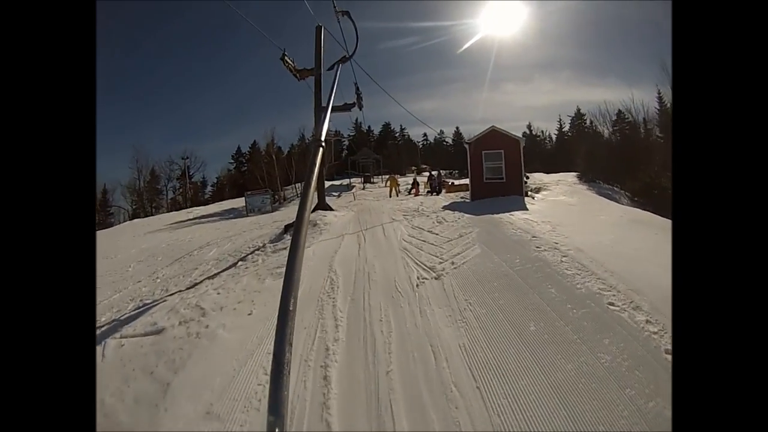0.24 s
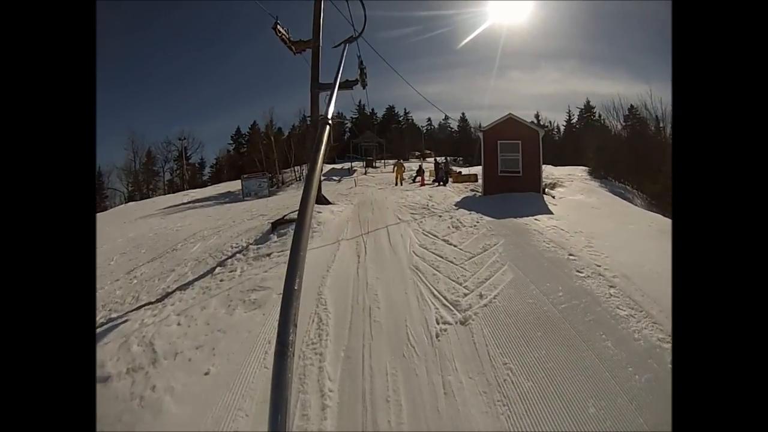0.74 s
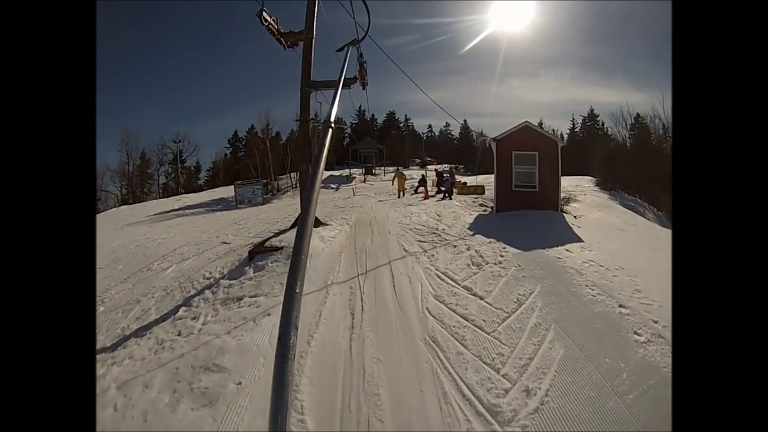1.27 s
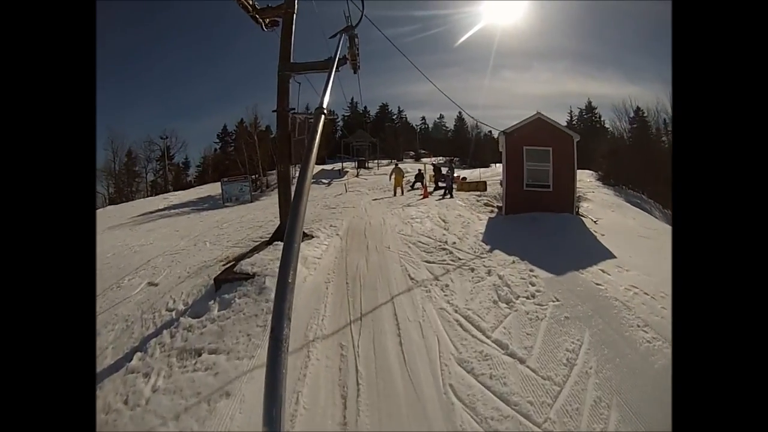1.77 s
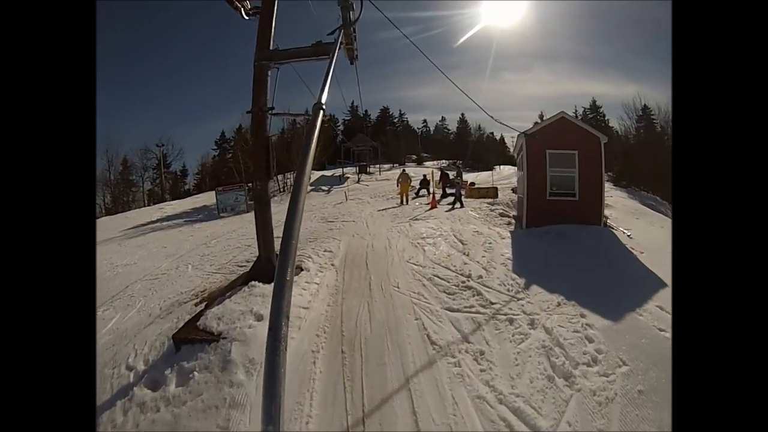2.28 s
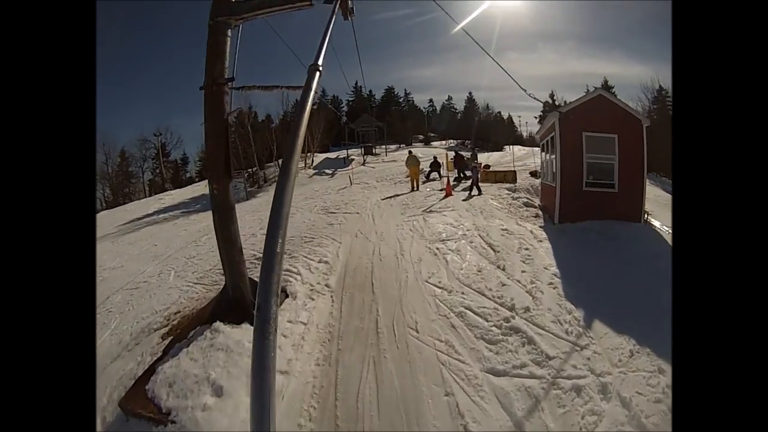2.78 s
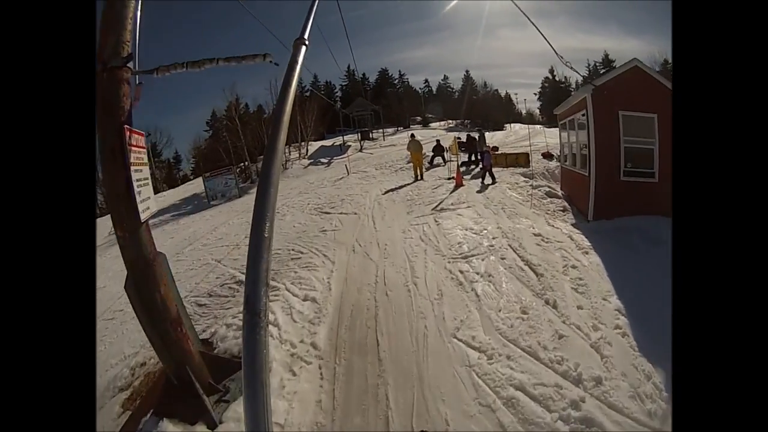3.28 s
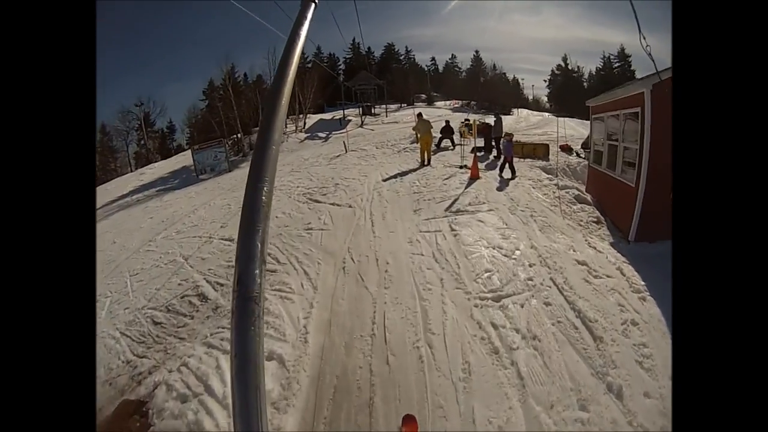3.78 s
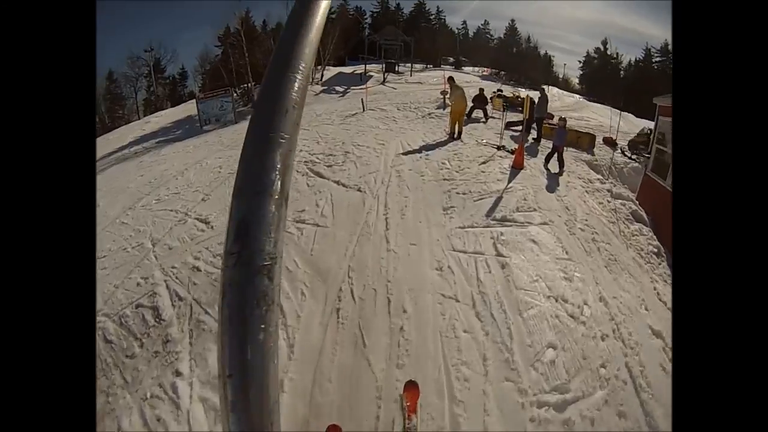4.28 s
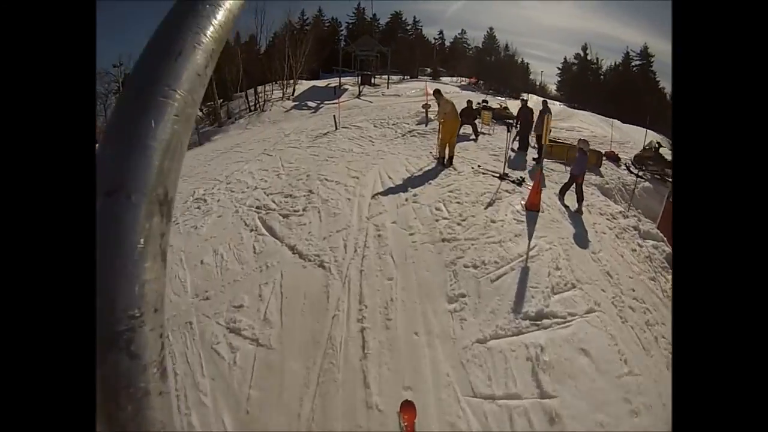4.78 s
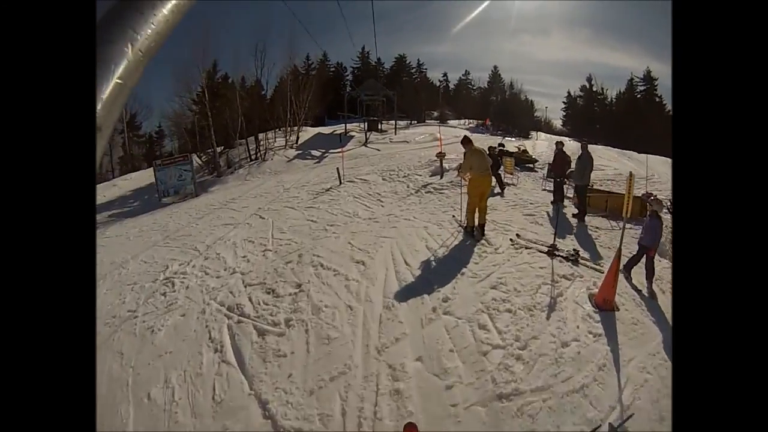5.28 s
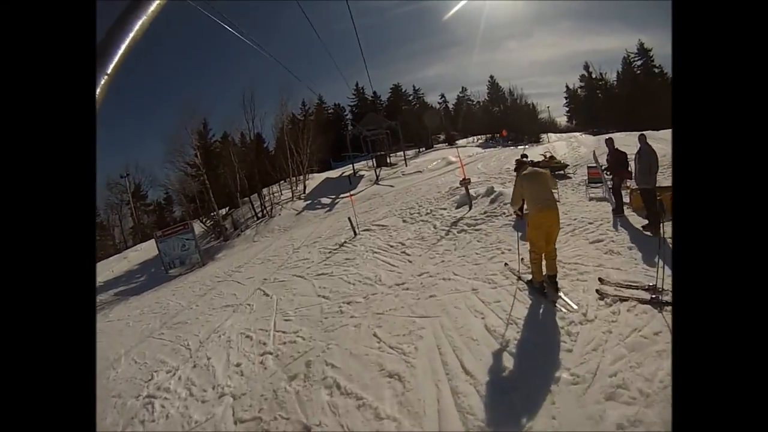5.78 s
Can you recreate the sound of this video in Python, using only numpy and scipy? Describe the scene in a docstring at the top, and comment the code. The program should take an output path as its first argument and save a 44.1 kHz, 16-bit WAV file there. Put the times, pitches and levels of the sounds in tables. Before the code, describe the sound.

Steely ticking and chatter swell into a loud ringing clatter, then ease to a rubbing hum, a sharp clank and a rough metallic scrape.

```python
"""Snowy slope on a surface ski lift: a steel pole tows a rider, heard by a small camera in a closed housing.
Grip and spring knock and chatter, hardest over the tower wheels: pulses ringing modes, plus coloured noise.
Rope friction keeps the steel singing: a hail of tiny slips drives the same modes; loose parts tick at random.
Light wind rumbles and flutters on the housing over a steady hiss, all coloured noise.
At the end the pole swings aside and scrapes: the slips drive a few bands of their own."""
import sys
import numpy as np
from scipy import signal
from scipy.fft import rfft, irfft
from scipy.io import wavfile
from scipy.ndimage import uniform_filter1d

SR = 44100
rng = np.random.default_rng(int(sys.argv[2]) if len(sys.argv) > 2 else 0)


def wav_out(sig):
    """Save sig, one row per channel (or a flat mono array), as 16-bit PCM at SR to the path in sys.argv[1]."""
    wavfile.write(sys.argv[1], SR, np.round(np.clip(np.atleast_2d(sig).T, -1, 1) * 32767).astype(np.int16))


N = 266356


def undb(db):
    """Amplitude of a level in dB."""
    return 10 ** (np.asarray(db) / 20)


def unit(x):
    """Scale to rms 1."""
    return x / np.sqrt(np.mean(x ** 2))


def curves(table):
    """Columns of a table joined by straight lines in time."""
    s, *columns = np.transpose(table)
    return [np.interp(np.arange(N) / SR, s, column) for column in columns]


def colour(x, points, size=2048):
    """Minimum-phase filter shaped by f/Hz, gain/dB points; white noise keeps its power."""
    hz, db = np.transpose(points)
    grid = np.maximum(np.arange(size + 1) * SR / 2 / size, 1)
    log_gain = np.interp(np.log(grid), np.log(hz), db) * np.log(10) / 20
    # folding the cepstrum onto positive time makes the filter causal
    cepstrum = irfft(log_gain)
    cepstrum[1:size] *= 2
    cepstrum[size + 1:] = 0
    taps = irfft(np.exp(rfft(cepstrum)))
    return signal.fftconvolve(x, taps / np.sqrt(np.sum(taps ** 2)))[:N]


def white():
    """White noise with spread 1."""
    return rng.standard_normal(N)


def turns(shape):
    """Unit phasors at random phases."""
    return np.exp(2j * np.pi * rng.random(shape))


def fall(x, t60):
    """Decay that dies 60 dB in t60 s."""
    return signal.lfilter([1], [1, -np.exp(-np.log(1000) / (t60 * SR))], x)


def walk(rate):
    """Random levels held 1 / rate s and slewed twice; spread 1."""
    steps = np.repeat(rng.standard_normal(int(N / SR * rate) + 2), 16)
    for _ in range(2):
        steps = uniform_filter1d(steps, size=16)
    return np.interp(np.arange(N) * 16 * rate / SR, np.arange(len(steps)), unit(steps))


def carrier(hz, wander=.003):
    """Turning phase of a mode whose pitch shifts a little with the load on the pole."""
    return np.exp(2j * np.pi * np.cumsum(hz * (1 + wander * walk(6))) / SR)


def slips():
    """Friction is a hail of tiny slips of uneven size that comes in bunches."""
    size_db = 3.2 * rng.exponential(size=N)
    bunching_db = 1.3 * walk(120) + 0.21 * walk(30)
    return unit(undb(size_db + bunching_db))


def rubbed(hail, noise, t60):
    """Envelope of a mode that the slips keep ringing; rms 1 once on its carrier."""
    ring = fall(hail * np.roll(noise, rng.integers(N)), t60)
    return ring * np.sqrt(2 / np.mean(np.abs(ring) ** 2))


# how hard the rope shakes the grip: t/s, level/dB
SHAKE = [(0, -7.5), (.4, -17.5), (.64, -4.5), (.96, -10.5), (1.3, -0.5), (1.4, -9), (1.55, -17),
         (1.8, -8.5), (2.08, 0), (2.24, -7.5), (2.59, 5.5), (2.89, 8), (3.03, 8.5), (3.26, 11), (3.55, 4.5),
         (3.82, 0.5), (4.1, -4.5), (4.47, -4), (4.81, -1), (5.3, 0.5), (6.04, -1)]
# slow change in the colour of the friction: t/s, lift of the middle/dB, lift of the treble/dB
DRIFT = [(0, 2, 2), (.95, 1, -3), (2.3, -15, 9.5), (3.2, 10, 7), (4.1, 6, 9.5), (4.8, 10, 3),
         (5.1, 12.5, -11), (5.45, 9.5, 0), (6.04, 5.5, -5)]
# friction on each part of the steel, low to high:
# level/dB, share of the shake, share of the middle lift, share of the treble lift (dB per dB)
PARTS = [(-70, 1.2, .4, .01), (-74, 0.79, 1.26, .01), (-53.5, .6, 0.11, 0.022), (-60, 0.46, 1.04, .01),
         (-60.5, 1.3, 0.52, .01), (-59, 0.96, .01, .01), (-65.5, 0.87, 0.83, .01), (-64, 1.03, .01, 0.99),
         (-77, 1.1, .01, .6)]


def friction_levels():
    """Level in dB over time of the rope's rubbing on each part of the steel."""
    shake, = curves(SHAKE)
    return np.array(PARTS) @ np.array([np.ones(N), shake, *curves(DRIFT)])


# wind strength: t/s, level/dB
WIND = [(0, -60.5), (1.4, -59), (1.7, -59), (2.34, -59), (2.44, -51.5), (3.5, -51.5), (3.75, -55.5),
        (4.5, -53.5), (6.04, -49.5)]
# single gusts on top of it: t/s, lift/dB
GUSTS = [(4.69, 4.9), (5.03, 5), (5.33, 7), (5.662, 6), (5.85, 9), (6.04, 2.3)]
GUST_S = 0.038  # spread of each bell-shaped gust, s


def wind_levels():
    """Level of the wind in dB over time: a slow curve with short bell-shaped gusts."""
    t = np.arange(N) / SR
    gusts_db = sum(db * np.exp(-((t - s) / GUST_S) ** 2 / 2) for s, db in GUSTS)
    return curves(WIND)[0] + gusts_db


# bass colour of the wind: f/Hz, relative level/dB (per Hz)
WIND_COLOUR = [(12, -28), (20, -0.5), (33, -3), (65, -2.5), (78, -3.5), (102, -16.5), (130, -29),
               (170, -44), (290, -120)]


def wind_rumble(wind_db):
    """Turbulence pushes on the housing: low coloured noise with a wandering level."""
    return undb(wind_db + 0.66 * walk(5.8)) * colour(white(), WIND_COLOUR, size=8192)


# colour of the flutter: f/Hz, relative level/dB (per Hz)
FLUTTER = [(100, -25), (190, 7), (300, 0.5), (520, -24)]
FLUTTER_DB, FLUTTER_SHARE = -74.5, 0.97  # level in the opening wind, dB; dB per dB of wind


def wind_flutter(wind_db):
    """Higher turbulence that grows with the wind."""
    flutter_db = FLUTTER_DB + FLUTTER_SHARE * (wind_db - WIND[0][1])
    return undb(flutter_db) * colour(white(), FLUTTER)


# colour of the hiss: f/Hz, relative level/dB (per Hz)
HISS = [(53, -24.5), (90, 2.5), (864, -12.5), (1550, -3), (1760, -6.5), (3290, -6.5), (3820, -3),
        (4950, -19), (5750, -13), (11500, -22.5), (15500, -33)]
HISS_DB = -52


def hiss():
    """Steady coloured noise of skis and microphone."""
    return undb(HISS_DB + 0.3 * walk(5.4)) * colour(white(), HISS)


def air():
    """One wind drives rumble and flutter; the hiss lies beneath."""
    wind_db = wind_levels()
    return wind_rumble(wind_db) + wind_flutter(wind_db) + hiss()


# knocks of grip and spring on the pole:
# t/s, level/dB, then shares of the tube/dB, of the clear ring/dB, of the treble parts/dB
KNOCKS = [(0.039, -45, 3, -14, -11), (0.2864, -38, -5, -6, -15), (.436, -36, -8, -6.5, -13),
          (0.5573, -44, -15, -6, -7), (.707, -29, -8, -25, -19), (0.712, -32.5, -18, -3, -18),
          (0.86, -46, -13, -7, -23), (1.2652, -28, -14, -4.5, -13), (1.286, -46, 5, 1.5, -24),
          (1.4128, -22, -6, -3, -9.5), (1.4513, -39.5, -15, -11, -9), (1.5893, -37, -30, -15, -10),
          (1.6005, -32.5, -25, -5.5, -14), (1.6376, -32, -3, -4, -12), (1.6452, -35.5, -16, 2, -7),
          (1.7557, -29.5, -10.5, -7, -19), (1.8372, -21.5, -17, -2, -17), (1.8546, -32.5, -27, 1.5, -9),
          (1.9345, -42, 6.5, -22, -8), (1.9875, -20.5, -16, -16, -23), (2.0097, -28.5, -30, 4, -8.5),
          (2.133, -26, -9, -5, -12.5), (2.1477, -37, -23, -22, -5), (2.2411, -31.5, -2.5, 3.5, -1),
          (2.3819, -27.5, -7, 4, -10), (2.3904, -40, -30, -29, 2), (2.499, -38, 6, 4, 4),
          (2.5174, -27.5, -33, -22, -10), (2.5287, -27.5, -6, -0.5, -5), (2.642, -27.5, -7, -0.5, -10),
          (2.669, -31, -11, -14, -16), (2.683, -30, -9, -1, -6), (2.7292, -21, -39, -2.5, -10.5),
          (2.749, -28.5, -12, 0, -5), (2.7735, -25.5, -15, -2.5, -9), (2.7908, -23, -3, -28, -1),
          (2.8485, -22.5, -22, -25, -15), (2.8582, -22, -27, -18, -18), (2.8769, -15, -10, -7, -5.5),
          (2.8882, -16, -10, -20, -27), (2.935, -20.5, -13, -8, -14), (2.974, -23, -24, -24, -3),
          (2.989, -22, -26, -12, -12), (3.041, -23, -4, -25, -3), (3.0939, -21.5, -34, -25, -13),
          (3.1087, -26, -31, -15, -24), (3.131, -30, -15, -19, -26), (3.1378, -14.5, -24, -13, -13),
          (3.233, -34.5, -9, -10, 3), (3.263, -21, -12, -32, -10), (3.276, -22.5, -25, -3.5, -7),
          (3.29, -24, -17, -14, -8), (3.3338, -29, 3, -23, -7), (3.3437, -14, -12, -30, -23),
          (3.3846, -9, -7.5, -10, -7), (3.42, -55, -15, 14, -21), (3.5665, -41, -6, -4, -1),
          (3.5903, -27.5, 0.5, -17, -8), (3.7147, -26, -18, -34, -9), (3.827, -36, 3, -11, -13),
          (3.8597, -37.5, -5, -1, -14), (4.0497, -46.5, 11, -19, -5), (4.122, -40, -3, -22, -17),
          (4.4119, -32, 6.5, 1, -5), (4.778, -44, -4, 9, -6), (4.897, -33.5, 8, 14, 0.5),
          (5.0795, -16, -4, 3.5, -13.5), (5.4051, -43, -16, 5, -20), (5.605, -41.5, 11, 3, -7),
          (5.7594, -43.5, -1, 0, -10)]
TOP_SCATTER_DB = 3


def knock_levels():
    """Level in dB of every knock in each part of the steel, low to high."""
    s, strike_db, tube, clear, collar = np.transpose(KNOCKS)
    top_scatter = TOP_SCATTER_DB * rng.standard_normal(len(s))
    return strike_db + np.array([
        tube - 33., tube - 29., tube - 8., tube - 9.,
        clear - 4.5,
        0 * tube - 8.,
        collar - 10., collar - 16., 1.35 * collar - 5. + top_scatter])


CHATTER_MS = 4.8


def chatter(count=6):
    """Sample and level of each hit: a knock is a first contact and a few weaker, scattered rebounds."""
    s = np.transpose(KNOCKS)[0]
    late = rng.random((len(s), count)) * (np.arange(count) > 0)  # share of the chatter length
    at = np.clip(((s[:, None] + late * CHATTER_MS / 1000) * SR).astype(int), 0, N - 1)
    rebound_db = (late > 0) * (-6. - 4.26 * late + 0.87 * rng.standard_normal(late.shape))
    return at, rebound_db


SINGS_HZ = 3626  # the mode that holds the clear ring
SINGS_ON_DB, SINGS_ON_SHARE, SINGS_ON_T60_S = -34, 0.33, 0.42  # level; dB per dB of knock; decay


def clear_ring():
    """Envelope of the ring a knock leaves singing; hard knocks make it only a little louder."""
    s, strike_db, _, clear, _ = np.transpose(KNOCKS)
    ring_db = SINGS_ON_DB + SINGS_ON_SHARE * strike_db + clear
    struck = np.zeros(N, complex)
    np.add.at(struck, (s * SR).astype(int), undb(ring_db) * turns(len(s)))
    return fall(struck, SINGS_ON_T60_S) * undb(5.0 * walk(60))


RATTLE_PER_S = 70


def rattle(rub_db):
    """Loose parts tick at random, and stand out more the harder the rope shakes."""
    ticks = np.flatnonzero(rng.random(N) < RATTLE_PER_S / SR)
    shaken_db = 1.33 * (rub_db[6][ticks] + 36.0)
    return ticks, 1.73 + 3.9 * rng.exponential(size=len(ticks)) + shaken_db


# modes of the pole and its fittings: f/Hz, level/dB, t60/s
STEEL = [(570, 0, .03), (870, 0, .1), (1150, -14, .1), (1470, -6, .05), (1570, 0, .08), (1900, -4, .07),
         (1970, -5, .06), (2240, -2, .06), (2490, -10, .06), (2740, -5, .08), (3130, -4, .08),
         (3626, 0, .13), (3692, -4, .08), (3785, -4, .07), (3945, -3, .045), (4060, 0, .05),
         (4190, -2, .055), (4345, -1, .055), (4410, -1, .05), (4495, -1, .04), (4680, -6, .06),
         (4850, -11, .05), (5700, -2, .05), (5880, 0, .04), (6230, -2, .04), (6410, -3, .05),
         (7030, -3, .04), (7420, 0, .03), (10220, -2, .055), (10320, 0, .06)]
# borders between the parts of the steel, low to high: f/Hz
PARTS_HZ = (700, 1000, 2450, 3450, 3740, 5000, 6600, 9000)


def ringing_modes(noise, hail, rub_db, hits, rattling):
    """Knocks, rattle and friction ring the same decaying modes."""
    (at, rebound_db), (ticks, tick_db) = hits, rattling
    knock_db, ring = knock_levels(), clear_ring()
    out = np.zeros(N)
    for hz, db, t60 in STEEL:
        part = np.searchsorted(PARTS_HZ, hz)
        # each knock lands elsewhere and so weights the modes anew
        spot_db = 8 * (rng.random((len(at), 1)) - .5)
        size_db = knock_db[part][:, None] + db + spot_db + rebound_db
        push = np.zeros(N, complex)
        np.add.at(push, at, undb(size_db) * turns(at.shape))
        push[ticks] += undb(rub_db[part][ticks] + db + tick_db) * turns(len(ticks))
        # lasting contact damps a rubbed mode more than a struck one
        drag = undb(rub_db[part] + db + 3.8 * walk(9)) * rubbed(hail, noise, 0.49 * t60)
        envelope = fall(push, t60) + drag + (hz == SINGS_HZ) * ring
        out += (envelope * carrier(hz)).imag
    return out


# colour of broad contact noise: f/Hz, relative level/dB (per Hz)
HOUSING = [(180, -71), (300, -18), (1300, -19), (1540, -10.5), (1730, -27.5), (1970, -5), (2930, -9),
           (4210, 5), (5130, -10), (5950, -1.5), (7250, -8), (8420, -21.5), (10600, -15.5), (13600, -20.5),
           (15500, -112)]


def contact_noise(hail, rub_db, hits, rattling):
    """The contact itself: a crack, a longer chatter and the steady rasp, as coloured noise."""
    (at, rebound_db), (ticks, tick_db) = hits, rattling
    _, strike_db, _, _, collar = np.transpose(KNOCKS)
    # its treble follows the collar and rim, its body the fittings
    sides = (("low", strike_db, rub_db[5] + 9.0),
             ("high", strike_db + 0.52 * collar + 8.5, rub_db[7] + 7.0))
    out = np.zeros(N)
    for side, blow_db, rasp_db in sides:
        blows = np.zeros(N)
        np.add.at(blows, at, undb(blow_db[:, None] + rebound_db))
        blows[ticks] += undb(rasp_db[ticks] + tick_db + 15.0)
        crack = undb(-10.0) * fall(blows, 0.013)
        long_chatter = undb(-25.0) * fall(blows, 0.19)
        rasp = undb(rasp_db - 5.0) * hail
        contact = colour((crack + long_chatter + rasp) * white(), HOUSING)
        split = signal.butter(4, PARTS_HZ[5], side, fs=SR, output="sos")
        out += signal.sosfilt(split, contact)
    return out


def steel(noise):
    """The pole rings and rasps from one set of knocks, ticks and slips; little of it sounds below 650 Hz."""
    rub_db, hits, hail = friction_levels(), chatter(), slips()
    rattling = rattle(rub_db)
    out = ringing_modes(noise, hail, rub_db, hits, rattling)
    out += contact_noise(hail, rub_db, hits, rattling)
    return signal.sosfilt(signal.butter(3, 650., "high", fs=SR, output="sos"), out)


# scrape of the swinging pole: t/s, level/dB
SCRAPE = [(5.25, -79), (5.372, -45.5), (5.504, -66), (5.55, -43.5), (5.62, -44), (5.7, -46.5),
          (5.804, -49.5), (5.85, -48), (5.93, -46), (6.04, -58)]
# bands the scrape sings in: f/Hz, relative level/dB, t60/s
SCRAPE_BANDS = [(1008, 1, 0.17), (1177, -7, 0.11), (1640, -19, 0.07), (2064, -7, 0.16), (2104, 1.5, 0.075),
                (2336, -6.5, 0.17), (6070, 11.5, 0.036)]
# borders between its low, middle and high bands: f/Hz
SCRAPE_PARTS_HZ = (1500, 5000)
SCRAPE_LOW_DB, SCRAPE_HIGH_DB, SCRAPE_RISE_DB_PER_S = -14.5, -24, 19


def scrape(noise):
    """Rough, broken singing of slips on the pole; its treble grows as the pole swings out."""
    level, = curves(SCRAPE)
    hail = slips()
    since = np.arange(N) / SR - SCRAPE[0][0]
    high = level + SCRAPE_HIGH_DB + SCRAPE_RISE_DB_PER_S * since
    levels = level + SCRAPE_LOW_DB, level, high
    out = np.zeros(N)
    for hz, db, t60 in SCRAPE_BANDS:
        band_db = levels[np.searchsorted(SCRAPE_PARTS_HZ, hz)] + db + 4 * walk(16)
        out += undb(band_db) * (rubbed(hail, noise, t60) * carrier(hz)).imag
    return np.clip(since / 0.055, 0, 1) * out  # fades in over 0.055 s


def scene():
    """One microphone feeds both channels."""
    noise = turns(N)
    return np.tile(steel(noise) + air() + scrape(noise), (2, 1))


TOP_HZ = 15400


def record(dry):
    """The camera rounds the loudest peaks and cuts the top."""
    rounded = np.tanh(1.436 * dry) / 2.32
    return signal.sosfilt(signal.ellip(8, .2, 70, TOP_HZ, fs=SR, output="sos"), rounded)


dry = scene()
out = record(dry)
wav_out(out)
```